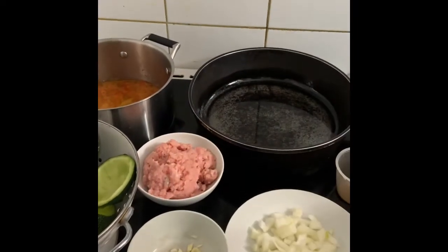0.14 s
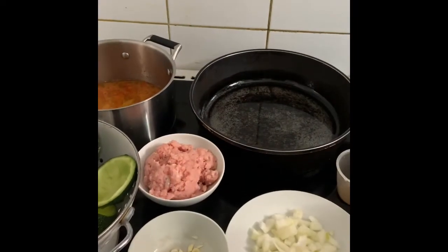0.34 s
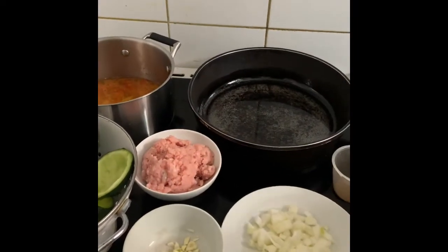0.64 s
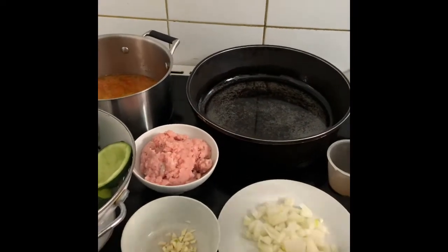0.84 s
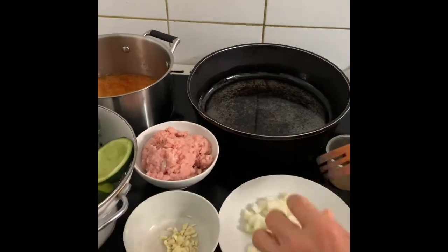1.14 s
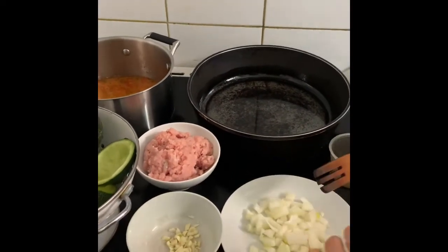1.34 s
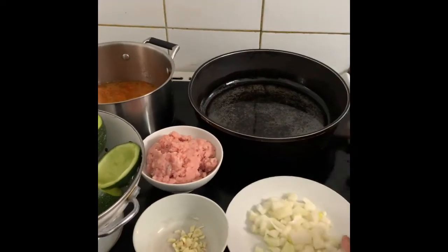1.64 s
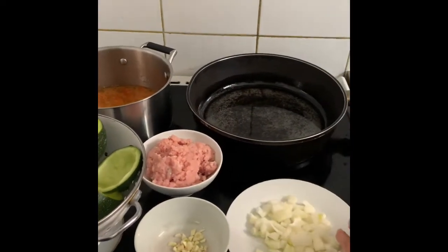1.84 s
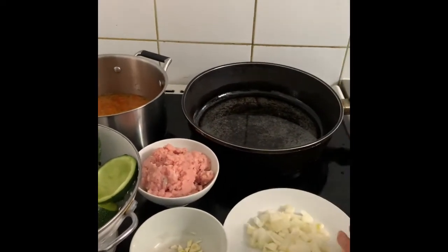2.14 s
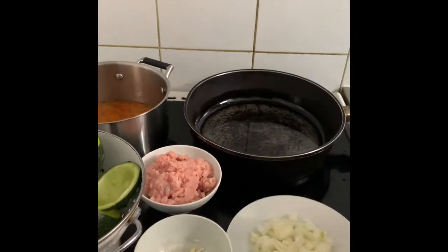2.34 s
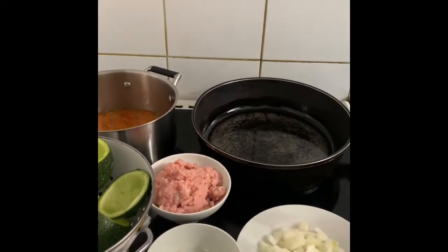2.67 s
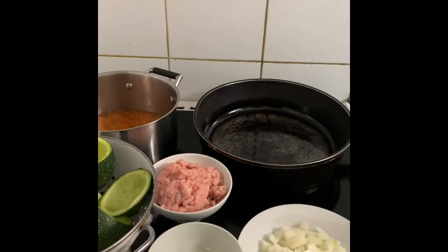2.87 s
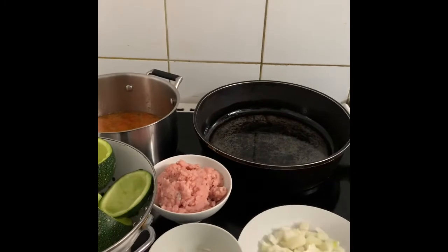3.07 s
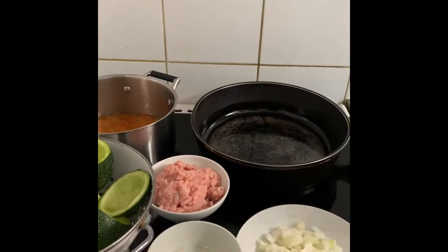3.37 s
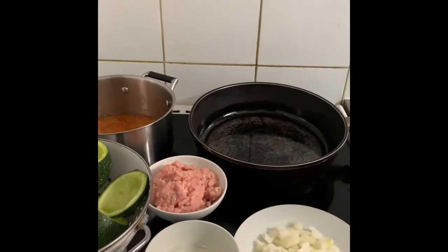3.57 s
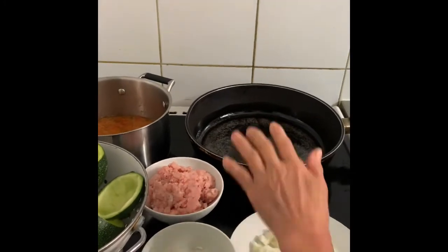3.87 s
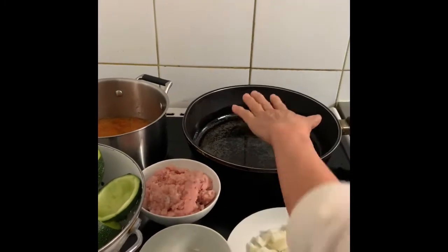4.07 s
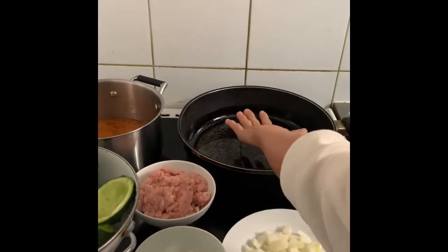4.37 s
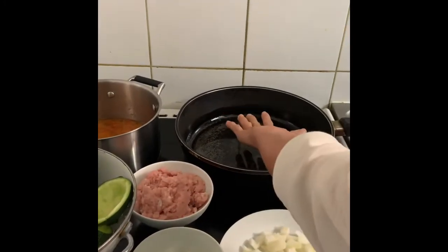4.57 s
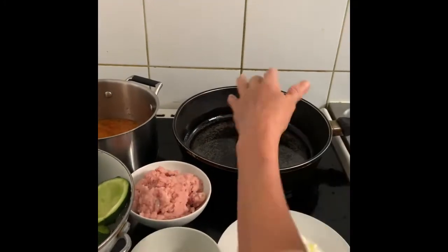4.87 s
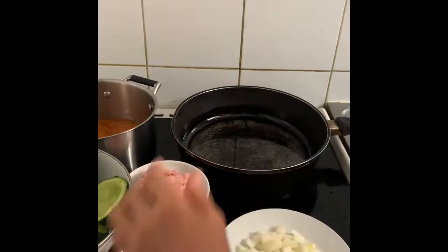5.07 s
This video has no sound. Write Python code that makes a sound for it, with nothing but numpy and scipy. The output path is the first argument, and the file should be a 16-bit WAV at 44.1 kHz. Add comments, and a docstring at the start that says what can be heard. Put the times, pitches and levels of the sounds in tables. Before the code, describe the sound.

A heavy bowl lands and rocks beside a stove with dull thuds, then dishes and lids clack and knock in a small tiled kitchen.

```python
"""Kitchen counter clatter

A heavy bowl is set down by a stove and rocks; dishes and lids knock, click and ring on the counter.
Blows are coloured pulses that set off a noise rattle, counter modes and the echoes of a small tiled kitchen.
Floor boards thud as decaying sines; sleeves rustle in shaped noise over a low hum with a wavering drone.
The right channel is the left turned in phase by pitch, plus some sound of its own, which widens the stereo."""
import sys
import numpy as np
from scipy import signal
from scipy.fft import rfft, irfft, next_fast_len
from scipy.io import wavfile
from scipy.ndimage import uniform_filter1d

SR = 44100
rng = np.random.default_rng(int(sys.argv[2]) if len(sys.argv) > 2 else 0)


def store_pcm(level_fs):
    """Save levels as 16-bit WAV."""
    pcm = np.round(np.clip(level_fs, -1, 1) * 32767).astype(np.int16)
    wavfile.write(sys.argv[1], SR, np.atleast_2d(pcm).T)


N = 229849  # length in samples


def gain_of(db):
    """Turns decibels into an amplitude factor."""
    return 10 ** (np.asarray(db) / 20)


def evened(x):
    """Scales a signal to rms 1."""
    return x / np.sqrt(np.mean(x ** 2) + 1e-20)


def read(points, hz):
    """Reads a curve between its points on a log-frequency axis."""
    point_hz, value = np.transpose(points)
    return np.interp(np.log(hz + 1), np.log(point_hz + 1), value)


def minimum_phase_pulse(spectrum, size=4096):
    """Packs a spectrum into a pulse whose energy comes as early as possible."""
    hz = abs(np.fft.fftfreq(size, 1 / SR))
    log_gain = np.log(gain_of(read(spectrum, hz)))
    pulse = np.fft.ifft(np.exp(np.conj(signal.hilbert(log_gain)))).real
    return pulse[:size // 2]


def patchy_noise(spectrum, patchy_db):
    """Makes two unrelated noises of one spectrum with shared drifting loud and soft patches."""
    frames, hz = N // 256 + 5, np.fft.rfftfreq(1024, 1 / SR)
    a, b, c, d, patches = rng.standard_normal((frames, 513, 5)).T
    patches = uniform_filter1d(patches, size=14, axis=0)  # blur across pitch
    patches = evened(uniform_filter1d(patches, size=12, axis=1))  # blur along time
    level_db = read(spectrum, hz)[:, None] + patchy_db * patches
    bins = np.array([a + 1j * b, c + 1j * d]) * gain_of(level_db)
    return evened(signal.istft(bins, nperseg=1024, noverlap=768)[1][:, :N])


# the bowl, dishes and lids landing and rocking:
# (start_s, blow_db, weight_db, hollowness_db, hardness_db, rattle_t60_s)
KNOCKS = [(0.002, 7.5, 0.5, 3, -11, 0.015), (0.044, 2.5, 2, -8, -7.5, 0.015),
          (0.111, -3, 2.5, -3, -11.5, 0.05), (0.134, 8.5, 7, -0.5, 0.5, 0.037),
          (0.152, 15, -1.5, -3.5, -18.5, 0.048), (0.184, 5.5, 5.5, -6.5, -9, .048),
          (0.215, -0.5, -22.5, 10, -2.5, 0.045), (0.248, 6, 2, -0.5, -13, 0.074),
          (0.29, -6.5, 10.5, -3, -8, 0.018), (0.345, 0.5, -4, 4.5, -24, 0.039),
          (0.58, -0.5, -6, -11, -10, 0.019), (0.61, -11, -2.5, 19.5, -4, 0.1),
          (0.625, -7.5, -2.5, 12.5, -13.5, 0.03), (0.649, -16.5, -13.7, 10, -29, .082),
          (0.858, -11.5, -2, 1.5, -17.5, 0.041), (1.4, -16, 8, 1, -38, 0.02),
          (1.964, -6.5, -15, -15.5, -12, 0.076), (1.977, 13.5, -39, -3.5, -8.5, 0.049),
          (1.987, 14, -15.5, -11, -23.5, 0.1), (2.029, 11.5, -35, -3, -25.5, 0.038),
          (2.891, -3, -7, -10.5, -20.5, 0.043), (2.933, 10, -45.5, -3.5, -12, 0.026),
          (2.95, 4.5, -31.5, -12, -18.5, 0.039), (3.129, 9, -50, -3, -14.5, 0.011),
          (3.145, 14, -50, -12.5, -17.5, .018), (3.174, 2.5, -43, -18.5, -18, 0.13),
          (3.493, 13, -32, -15.5, -9.5, 0.033), (3.503, 0, -19.5, -12.5, -26, 0.03),
          (3.515, -1.5, -23, -6, -8.5, 0.045)]


def knocks():
    """Heavy pieces hit the counter, each blow with its own weight, hollowness, hardness and rattle."""
    return [(start_s, strike(db, blow_colour(weight, hollow, hard), hz=490, ring_db=-5, touch_db=-8.5,
                             kitchen_db=5, rattle_t60=t60))
            for start_s, db, weight, hollow, hard, t60 in KNOCKS]


# colour of a blow: (pitch_hz, base_db, weight_share, hollowness_share, hardness_share)
BLOW = [(40, -12, 1, 0, 0), (75, 3, 1.2, 0.24, 0.22), (107, 11.5, 0.86, 0.038, 0.035),
        (170, 6.5, 0.47, 0.16, 0.05), (303.3, 0.5, 0.025, 0.79, 0.014), (635, 4.4, 0.031, 0.15, 0.012),
        (1430, -0.74, 0, 0, 0.024), (2500, -2, 0.035, 0, 0.51), (6280, -5, 0.032, 0.086, 0.86),
        (14000, -7.5, 0.02, 0.2, 1)]


def blow_colour(weight_db, hollow_db, hard_db):
    """Tilts the spectrum of a blow by its weight, hollowness and hardness."""
    return [(hz, base_db + weight * weight_db + hollow * hollow_db + hard * hard_db)
            for hz, base_db, weight, hollow, hard in BLOW]


PIECE_T60 = 0.011  # s
GRAIN_DB = 3.5  # how unevenly the rattle's small contacts land, dB rms


def strike(db, spectrum, hz, ring_db, touch_db, kitchen_db, rattle_t60):
    """A first touch, a short rattle, the counter's ring and the kitchen's echoes share the blow's colour."""
    t = np.arange(SR // 2) / SR
    short_t = t[:2048]
    per_sample = 2 * np.log(1000) / (PIECE_T60 * SR)  # makes ring_db the gain added at the piece's pitch
    piece = per_sample * gain_of(ring_db - 60 * short_t / PIECE_T60) * np.sin(2 * np.pi * hz * short_t)
    piece[0] = 1
    blow = np.convolve(minimum_phase_pulse(spectrum), piece)

    rattle_fade = gain_of(-60 * t / np.clip(rattle_t60, .004, .2))
    rattle = rng.standard_normal((2, len(t))) * rattle_fade * (1 - np.exp(-t / 0.00082))
    grain = evened(uniform_filter1d(rng.standard_normal(len(t)), size=60))
    rattle = rattle * gain_of(GRAIN_DB * grain)
    rattle = rattle / np.linalg.norm(rattle[0])

    answer = rattle + gain_of(kitchen_db) * (counter_ring(t) + kitchen_echoes(len(t)))
    answer[:, 0] = gain_of(touch_db)
    sound = signal.fftconvolve(blow[None], answer, axes=1)[:, :len(t)]
    return gain_of(db) * sound * np.cos(np.pi * t) ** .5  # fades out by half a second


# what the counter and the stove ring with: (pitch_hz, level_db, t60_s), levels relative to COUNTER_DB
COUNTER = [(102, -12.5, 1), (113.3, 1, 0.24), (147.7, -1.5, 0.1), (169.5, -14.5, 0.5), (197.6, -4, 0.52),
           (296.5, 1.5, 0.34), (385, -13.5, 0.38), (438.5, -9, 0.29), (511.2, -4.5, 0.23),
           (630, -25.5, 0.15), (713.4, -16.5, 0.41), (881.4, -10, 0.3), (1170, -28, 0.15),
           (1195, -10, 0.21), (1470, -16.5, 0.045), (1810, -9.5, 0.073), (2370, -27.5, .15)]
COUNTER_DB = -41  # relative to the kitchen echoes


def counter_ring(t):
    """The counter and stove swing in many decaying modes."""
    modes = sum(gain_of(db - 60 * t / t60) * np.sin(2 * np.pi * hz * t) for hz, db, t60 in COUNTER)
    return gain_of(COUNTER_DB) * modes * (1 - np.exp(-t / 0.0044))  # a heavy slab takes a moment to swing


# how long the tiled kitchen rings: (pitch_hz, t60_s)
KITCHEN = [(80, 0.74), (250, 0.57), (700, 0.28), (2000, 0.3), (6000, 0.23), (14000, 0.12)]


def kitchen_echoes(size):
    """Two tails of scattered echoes from tiles and cupboards, each band dying at its own speed."""
    reflections = rng.standard_normal((2, size)) * (rng.random((2, size)) < .15)
    hz, t, bins = signal.stft(reflections, SR, nperseg=256)
    fade = gain_of(-60 * t / read(KITCHEN, hz)[:, None])
    tail = signal.istft(bins * fade, SR, nperseg=256)[1][:, :size]
    tail = tail * np.clip(np.arange(size) / SR / 0.0041 - .4, 0, 1)  # echoes thicken over the first moments
    return tail / np.linalg.norm(tail[0])


# short clacks, cracks and clicks, from faint to hard, each with a pitch of its own:
# (start_s, blow_db, pitch_hz, hardness_db, ring_at_pitch_db, kitchen_db)
CLACKS = [(1.336, -13.5, 1250, -25.5, 6.5, 9.5), (1.354, 5.5, 720, -43, 7.5, -8),
          (1.561, -7, 1410, -28.5, 4, -4.5), (1.645, 3.5, 1550, -14, 3, -1.5),
          (1.666, 0, 1290, -23.5, -18, -1.5), (1.689, -11.5, 1470, -43, 17.5, -4),
          (1.759, -13.5, 1970, 2.5, -4, 0.4), (1.858, -26, 1430, -41, 18.5, -6),
          (3.315, -7.5, 800, -22, -2.5, -0.5), (3.494, 22.5, 1170, -14, -4, -12),
          (3.527, -14, 1700, -31.5, 12, 0), (4.239, -33.5, 11800, 8.5, 11, -6)]


def clacks():
    """Short blows, from faint to hard, each excite a piece with a pitch of its own."""
    return [(start_s, strike(db, blow_colour(-32.5, -22.5, hard), hz, ring_db, touch_db=-2.9,
                             kitchen_db=kitchen_db, rattle_t60=0.022))
            for start_s, db, hz, hard, ring_db, kitchen_db in CLACKS]


# modes of a cup that rings clearly: (pitch_hz, level_db, t60_s)
CUP = [(1970, -0.5, .16), (2270, -8.5, 0.21), (2960, -3, .14), (3060, -1, .11)]
# modes of a dish: (pitch_hz, level_db, t60_s)
DISH = [(889, 0, 0.22), (611, -6.5, 0.38), (1314, -15, .2), (1600, -11, 0.11)]
# modes of a lid: (pitch_hz, level_db, t60_s)
LID = [(1738, -4.2, 0.13), (1970, -11.5, 0.15), (2350, -0.5, 0.086), (2520, -11.5, 0.16),
       (2960, -32.5, 0.66), (2975, -37, .5), (3940, -15.5, .14)]
# clear rings of struck pieces: (start_s, level_db, piece_modes)
RINGS = [(1.759, -48, CUP), (2.025, -23.5, DISH), (3.497, -27, LID), (3.52, -23.5, LID)]


def crockery_ring(db, modes):
    """A struck piece dies away as a sum of decaying sines with a quick rise."""
    t = np.arange(SR // 2) / SR
    tone = sum(gain_of(db + mode_db - 60 * t / t60) * np.sin(2 * np.pi * hz * t)
               for hz, mode_db, t60 in modes)
    return np.tile(tone * (1 - np.exp(-t / 0.0013)), (2, 1))


# a hand or sleeve brushing against something: (start_s, level_db)
BRUSHES = [(1.209, -22.5), (2.309, -26.5), (4.354, -22), (4.371, -19)]
# colour of a brush: (pitch_hz, level_db)
BRUSH = [(100, -5), (320, -15), (700, 2.5), (1400, -0.2), (2800, -1), (4500, -25), (7000, -40),
         (14000, -26)]


def brushes():
    """A brush is a blow with a weak first touch whose piece adds no pitch of its own."""
    return [(start_s, strike(db, BRUSH, hz=0, ring_db=-np.inf, touch_db=-15, kitchen_db=-2.5, rattle_t60=.06))
            for start_s, db in BRUSHES]


# weight shifting on the floor boards: (start_s, low_mode_db, high_mode_db)
STEPS = [(.005, -24, -36), (0.138, -35, -32), (0.333, -35, -35), (0.619, -33, -26.5), (0.677, -58, -34.5),
         (0.929, -34.5, -41), (1.398, -42, -44), (2.93, -36, -55)]
# low and high mode of the boards: (pitch_hz, t60_s)
BOARDS = [(52, 0.4), (85, 0.35)]


def step(low_db, high_db):
    """A soft push sets two floor modes swinging."""
    t = np.arange(SR // 2) / SR
    swing = sum(gain_of(db - 60 * t / t60) * np.sin(2 * np.pi * hz * t)
                for db, (hz, t60) in zip((low_db, high_db), BOARDS))
    return np.tile(swing * (1 - np.exp(-t / 0.019)), (2, 1))


# level of the rustle's soft part: (time_s, level_db)
RUSTLE = [(.01, -51.5), (.45, -71.5), (0.9, -63), (1.101, -71), (1.301, -65), (1.902, -72.5),
          (2.198, -64.5), (2.401, -78), (2.65, -67), (3.4, -69), (3.78, -70), (3.88, -60), (3.95, -58.5),
          (4.25, -68.5), (4.451, -95), (4.7, -93.5), (4.8, -66), (4.9, -64), (5.05, -67), (5.21, -60.5)]
# colour of cloth: (pitch_hz, relative_db_per_hz)
CLOTH = [(400, -25), (700, -4), (1000, -3), (2000, -7), (3500, -10), (5000, -12), (7000, -14), (10000, -18),
         (16000, -25)]
# at the near level the crisp part has CRISP_DB; it moves CRISP_GROWTH dB per dB of the soft part
NEAR_DB, CRISP_DB, CRISP_GROWTH = -58.5, -64, 1.83


def rustle():
    """Sleeves and hands moving: a soft hiss that comes and goes, crisper when the cloth is near."""
    soft_db = np.interp(np.arange(N) / SR, *np.transpose(RUSTLE))
    crisp_db = CRISP_DB + CRISP_GROWTH * (soft_db - NEAR_DB)
    hiss = patchy_noise(CLOTH, patchy_db=3.0)
    soft = signal.sosfiltfilt(signal.butter(2, 5000, fs=SR, output="sos"), hiss)
    return gain_of(soft_db) * evened(soft) + gain_of(crisp_db) * evened(hiss - soft)


# colour of the hum: (pitch_hz, relative_db_per_hz)
HUM = [(30, -20.5), (50, -2.5), (105, -5.5), (140, -13.5), (180, -6), (260, -9.5), (360, -17.5),
       (500, -15.5), (700, -28.5), (1150, -23.5), (1600, -40), (3000, -45.5), (5000, -65), (16000, -69.5)]
# pitches that the kitchen favours: (pitch_hz, width_hz, level_against_hum_db)
HUM_PEAKS = [(108.9, 8.3, -5), (251, 5.6, -10), (397, 10, -16), (483.7, 8.3, -12.5)]
HUM_DB = -49.5  # rms level of the wash
DRONE_HZ, DRONE_DB = 23.7, -55.5  # the level wavers around this


def hum():
    """The low noise of the house, louder at a few favoured pitches, over a sine drone of wavering level."""
    wash, drive = patchy_noise(HUM, patchy_db=4.0), rng.standard_normal((3, N))
    for hz, width_hz, db in HUM_PEAKS:
        peak = signal.lfilter(*signal.iirpeak(hz, hz / width_hz, SR), drive[:2])
        wash = wash + gain_of(db) * evened(peak)
    wash = signal.sosfilt(signal.butter(2, 48, "high", fs=SR, output="sos"), wash)
    waver_db = 5.7 * evened(uniform_filter1d(drive[2], size=8000))
    drone = gain_of(DRONE_DB + waver_db) * np.sin(2 * np.pi * DRONE_HZ * np.arange(N) / SR)
    return gain_of(HUM_DB) * evened(wash) + drone


def scene():
    """Lays every contact over the rustle and hum, as heard from two neighbouring spots."""
    rings = [(start_s, crockery_ring(*row)) for start_s, *row in RINGS]
    steps = [(start_s, step(*row)) for start_s, *row in STEPS]
    out = hum() + rustle()
    for start_s, sound in knocks() + clacks() + brushes() + rings + steps:
        part = out[:, round(start_s * SR):][:, :sound.shape[1]]
        part += sound[:, :part.shape[1]]  # a view, so this adds into out
    return out


# stereo widening, phase lead of the left channel: (pitch_hz, lead_rad)
LEAD = [(0, 0), (120, -.03), (550, -.45), (900, -.1), (1300, -.4), (1700, 0), (2600, 2.0), (3200, 1.2),
        (3800, 1.6), (4650, 3.1)]
# likeness of the left and right channels: (pitch_hz, likeness_0_to_1)
LIKENESS = [(150, 1), (500, 0.84), (700, 0.36), (1300, 0.7), (2700, 0.51), (4000, 0.22), (9000, 0.09)]
# past the last LEAD pitch the left channel's lead climbs half a turn per STAIR_HZ, lingering near in-phase and
# opposed
STAIR_FROM_HZ, STAIR_HZ, STAIR_FLAT = 2850, 2080, .45
EDGE_HZ = 15700  # top of the band


def record(dry):
    """Widens the stereo: the right channel is the left turned in phase plus its own part; then a band limit."""
    size = next_fast_len(N + 4096)
    hz = np.fft.rfftfreq(size, 1 / SR)
    one, other = rfft(dry, size)

    climb = np.pi * (hz - STAIR_FROM_HZ) / STAIR_HZ
    stairs = climb - STAIR_FLAT * np.sin(2 * climb)
    lead = np.where(hz > LEAD[-1][0], stairs, np.interp(hz, *np.transpose(LEAD)))

    # above 4 kHz the right channel's own part shrinks to nothing where the two are in phase or opposed
    apart = np.sqrt(1 - np.clip(read(LIKENESS, hz), 0, 1) ** 2)
    apart = np.where(hz > 4000, abs(np.sin(lead)), 1) * apart
    right = (np.sqrt(1 - apart ** 2) * one + apart * other) * np.exp(-1j * lead)
    pair = irfft(np.array([one, right]), size)[:, :N]

    pair = np.tanh(pair)  # rounds the loudest peaks
    band_limit = signal.firwin(255, EDGE_HZ, window=("kaiser", 9), fs=SR)
    return signal.oaconvolve(pair, band_limit[None], "same")


dry = scene()
out = record(dry)
store_pcm(out)
```